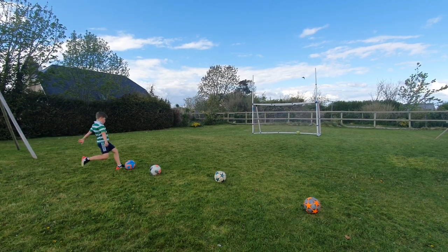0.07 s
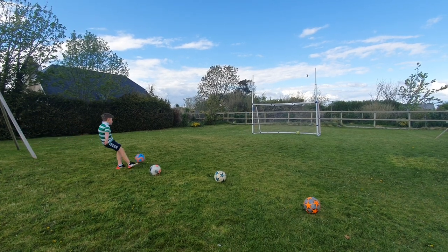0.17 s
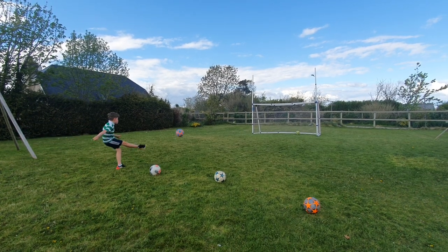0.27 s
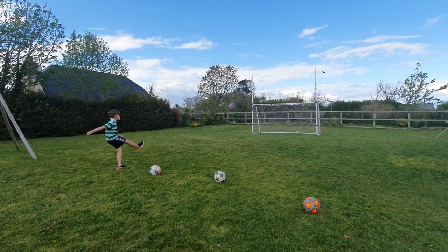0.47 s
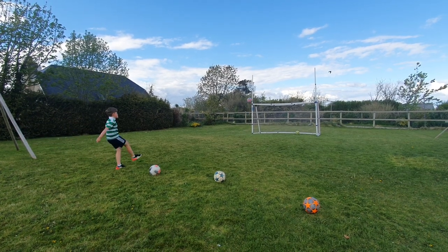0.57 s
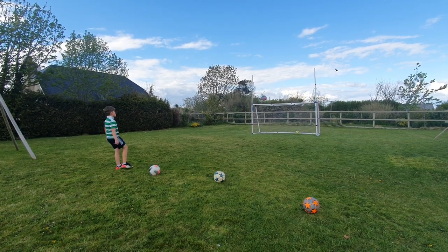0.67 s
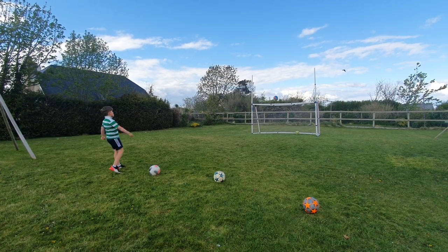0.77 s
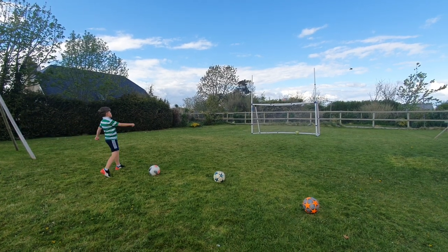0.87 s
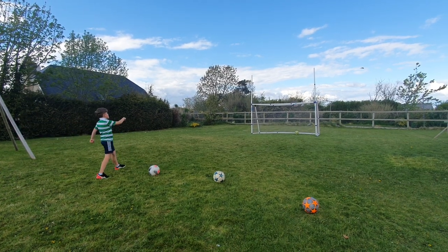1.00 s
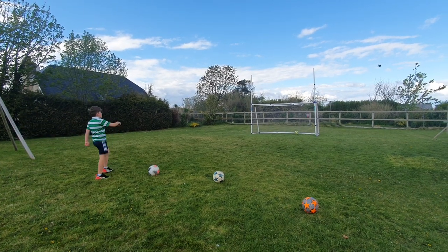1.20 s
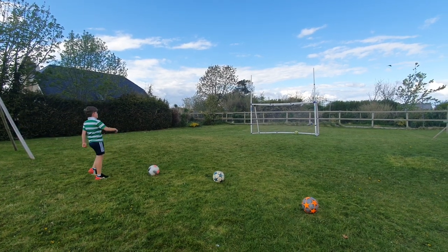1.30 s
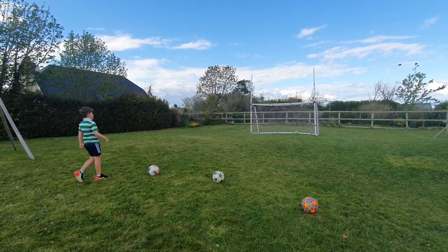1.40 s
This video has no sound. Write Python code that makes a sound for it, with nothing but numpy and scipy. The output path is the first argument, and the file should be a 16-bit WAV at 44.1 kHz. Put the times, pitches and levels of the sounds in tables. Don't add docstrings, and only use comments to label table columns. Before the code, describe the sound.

In an open garden, a ball is kicked with a punchy low thud and leathery crack, echoes fade quickly, then the ball hits a net that snaps and rustles, with a dull footfall near the end.

```python
import sys
import numpy as np
from scipy import signal
from scipy.fft import rfft, irfft, next_fast_len
from scipy.io import wavfile
from scipy.ndimage import uniform_filter1d

SR = 44100
rng = np.random.default_rng(int(sys.argv[2]) if len(sys.argv) > 2 else 0)


def field_ratio(decibels):
    return 10 ** (np.asarray(decibels, dtype=float) / 20)


def dump_mix(stems):
    frames = np.atleast_2d(stems).T
    limited = np.clip(frames, -1, 1)
    pcm = np.round(limited * 32767).astype(np.int16)
    wavfile.write(sys.argv[1], SR, pcm)


N = 63945
KICK_S = .2099
KICK_PORT_S, NET_PORT_S = .00021, -.0002

# (frequency [Hz], density [dB per Hz])
HUM_COLOUR = [(20, -13), (55, -0.5), (98, -1), (130, -9.5), (550, -22), (800, -16.5), (2100, -30),
              (2450, -43.5), (4500, -56), (15800, -79.5)]
# (frequency [Hz], correlation [-1 to 1])
PORT_LIKENESS = [(60, 0.92), (180, 1), (550, 0.37), (1650, -0.37), (4970, 0.014), (15000, 0.02)]
# (time [s], level [dB])
TRAFFIC_SWELL = [(0., 2), (0.201, 4), (0.499, 0), (.9, -1), (1.1, -1), (1.45, -1.5)]
# (start [s], length [s], pitch [Hz], level [dB])
BIRDS = [
    (0., .06, 4000, -89),
    (.975, .21, 2110, -69),
    (1.02, .06, 6300, -88),
    (.74, .07, 1800, -78),
]
# (frequency [Hz], density [dB per Hz])
CLOTH_COLOUR = [(1500, -43), (4500, 4), (7000, -4), (9000, 7), (12500, 6.5), (14000, -9), (16000, -15.5)]
NET_COLOUR = [(400, -13), (700, -1), (1400, 2), (2300, -0.5), (5000, -13), (6300, -18.5), (7500, -31),
              (15800, -44)]
SETTLING_COLOUR = [(880, -64), (1500, -1), (2040, -5.5), (2290, -8.5), (3780, -18), (4380, -12.5),
                   (15800, -34)]
GRASS_COLOUR = [(180, -33.5), (300, -6.5), (759, 3.5), (2230, -6), (5190, -11.5), (8540, -19.5),
                (9910, -10), (15800, -24)]
# (start [s], rise [s], hold [s], T60 [s], level [dB])
CLOTH_SWISHES = [
    (.06, .04, 0.025, 0.25, -70),
    (.775, 0.019, 0.015, 0.25, -78),
    (.83, 0.043, 0.044, 0.37, -77.5),
    (1.11, 0.081, 0.096, 0.14, -73.5),
]
NET_RATTLES = [
    (1.1612, 0.00056, 0.002, 0.22, -47.5),
    (1.175, 0.014, 0.03, 0.37, -47.5),
    (1.4, 0.05, .03, .3, -55.5),
]
NET_SETTLING = [
    (1.18, .012, 0.038, .4, -57),
    (1.26, .03, .03, .3, -60),
    (1.33, 0.0064, 0.0075, 0.3, -61.5),
    (1.37, .02, 0.017, 0.57, -62.5),
]
GRASS_SWEEP = [
    (.182, 0.026, 0.0088, 0.039, -34),
    (.21, .004, .015, .24, -46.5),
]
# (time [s], level [dB], centre [Hz])
CORD_SNAPS = [(1.162, -48, 4673), (1.162, -31, 1330), (1.19, -53, 10060), (1.193, -62, 4630),
              (1.211, -33, 1330), (1.222, -48, 1610), (1.241, -45, 4740), (1.446, -70, 8300)]
# (frequency [Hz], bandwidth [Hz], level [dB])
BALL_MODES = [(942, 138, 4), (1720, 340, -4), (2555, 500, -13), (3117, 340, -9.5), (3940, 190, -18.5),
              (4500, 300, -14.5), (5100, 220, -23.5), (7250, 490, -35), (8860, 700, -22),
              (10340, 1200, -29), (13500, 2000, -31)]
# (frequency [Hz], gain [dB])
LAWN_GAIN = [(100, 0), (200, 1.5), (350, 0.5), (420, -12), (500, -13.5), (700, -1.5), (2000, -9)]
# (delay [s], level [dB], sign)
FAR_ECHOES = [(.0481, -13, -1), (.0646, -2.5, -1), (.0785, -3.9, 1), (.1064, -8, 1), (.115, -5.6, 1),
              (.1382, -11.9, 1), (.1828, -23, -1)]
# (delay [s], length [s], level [dB], centre [Hz])
TREBLE_ECHOES = [(.0425, 0.0033, -34.5, 3000), (.048, 0.0031, -40, 4240), (.053, .003, -56, 6500),
                 (.075, 0.015, -43, 3900), (.125, 0.018, -54.5, 3460)]
# (frequency [Hz], T60 [s])
GARDEN_T60 = [(60, 0.35), (200, .25), (700, 0.83), (2500, 0.48), (5000, .33), (10000, 0.14), (15000, .12)]
# (frequency [Hz], left minus right [dB])
KICK_LEAN = [(60, -1), (300, 0), (1400, -9.5), (2600, 13), (5000, -2.5), (9500, -0.5), (15000, 6)]


def evened(x):
    return x / np.sqrt(np.mean(x ** 2) + 1e-20)


def read(points, hz):
    f, value = np.transpose(points)
    return np.interp(np.log(hz + 1), np.log(f + 1), value)


def late(x, s):
    size = next_fast_len(2 * N)
    hz = np.fft.rfftfreq(size, 1 / SR)
    return irfft(rfft(x, size) * np.exp(-2j * np.pi * hz * s), size)[:N]


def ports(x, s):
    return np.array([x, late(x, s)])


def ring(x, hz, width):
    r = np.exp(-np.pi * width / SR)
    return signal.lfilter([1 - r, 0, r - 1], [1, -2 * r * np.cos(2 * np.pi * hz / SR), r * r], x)


def band(x, hz, width):
    return ring(ring(x, hz, width), hz, width)


def cut(x, hz, kind):
    return signal.sosfilt(signal.butter(2, hz, kind, fs=SR, output="sos"), x)


def shape(start, rise, hold, t60, db):
    t = np.arange(N) / SR - start
    fall_db = 60 * np.clip(t - rise - hold, 0, 3) / t60
    return np.clip(t / rise, 0, 1) ** 0.83 * field_ratio(db - fall_db)


def burst(start, rise, hold, t60, db):
    return rng.standard_normal(N) * shape(start, rise, hold, t60, db)


def rustle(strokes, colour, grain_db, loose, port_s):
    hz = np.fft.rfftfreq(N, 1 / SR)
    grains = rng.standard_normal((3, N))
    unevenness = evened(uniform_filter1d(rng.standard_normal(N), size=60))
    z = rfft(grains * field_ratio(grain_db * unevenness)) * field_ratio(read(colour, hz))
    shared = np.array([z[0], z[0] * np.exp(-2j * np.pi * hz * port_s)])
    own = np.clip(loose * np.sqrt(hz / 3000), 0, .95)
    noise = evened(irfft(np.sqrt(1 - own ** 2) * shared + own * z[1:], N))
    power = sum(shape(*stroke) ** 2 for stroke in strokes)
    return np.sqrt(power) * noise


def traffic_hum():
    frames, hz = N // 256 + 5, np.fft.rfftfreq(1024, 1 / SR)
    a, b, c, d, patches = rng.standard_normal((frames, 513, 5)).T
    patches = evened(uniform_filter1d(uniform_filter1d(patches, 8, 0), 10, 1))
    same = np.clip(read(PORT_LIKENESS, hz), -1, 1)[:, None]
    left = a + 1j * b
    right = same * left + np.sqrt(1 - same ** 2) * (c + 1j * d)
    z = np.array([left, right]) * field_ratio(read(HUM_COLOUR, hz)[:, None] + 1.2 * patches)
    steady = evened(signal.istft(z, nperseg=1024, noverlap=768)[1][:, :N])
    swell_db = np.interp(np.arange(N) / SR, *np.transpose(TRAFFIC_SWELL))
    return field_ratio(swell_db - 48.5) * steady


def microphone_hiss():
    return field_ratio(-86) * rng.standard_normal((2, N))


def birds():
    t, out = np.arange(N) / SR, np.zeros(N)
    for start, length, hz, db in BIRDS:
        u = np.clip((t - start) / length, 0, 1)
        flutter_db = 2.2 * evened(uniform_filter1d(rng.standard_normal(N), size=500))
        swell = np.sqrt(abs(np.sin(np.pi * u)))
        turns = np.cumsum(hz * (1 - 0.0244 * u)) / SR
        out += field_ratio(db + flutter_db) * swell * np.sin(2 * np.pi * turns)
    return ports(out, .00005)


def cloth_swishes():
    return rustle(CLOTH_SWISHES, CLOTH_COLOUR, 1.5, .6, KICK_PORT_S)


def footfall():
    t = np.maximum(np.arange(N) / SR - 1.437, 0)
    level = field_ratio(-38.5 + 6 * np.array([[1], [-1]]))
    return level * np.minimum(t / 0.0046, 1) * np.sin(2 * np.pi * 73.4 * t)


def net_rustle():
    rattles = rustle(NET_RATTLES, NET_COLOUR, 2.8, 0.9, NET_PORT_S)
    return rattles + rustle(NET_SETTLING, SETTLING_COLOUR, 2.2, 1.0, NET_PORT_S)


def cord_snaps():
    ticks = sum(band(burst(s, .0003, 0.00033, 0.018, db + 1.5), hz, 0.65 * hz) for s, db, hz in CORD_SNAPS)
    return ports(ticks, NET_PORT_S)


def grass_sweep():
    return rustle(GRASS_SWEEP, GRASS_COLOUR, 2.8, .5, KICK_PORT_S)


def garden_tail(x):
    taps = np.zeros((2, SR // 2))
    slots = np.arange(700, SR // 2 - 20, 20)
    at = slots + rng.integers(0, 20, (2, len(slots)))
    np.put_along_axis(taps, at, rng.choice([-1., 1.], at.shape), 1)
    hz, t, z = signal.stft(taps, SR, nperseg=512)
    same = np.clip(read(PORT_LIKENESS, hz), -1, 1)[:, None]
    z = np.array([z[0], same * z[0] + np.sqrt(1 - same ** 2) * z[1]])
    decay = field_ratio(-60 * t / read(GARDEN_T60, hz)[:, None])
    tail = signal.istft(z * decay, SR, nperseg=512)[1]
    return signal.fftconvolve(x[None], tail / np.linalg.norm(tail[0]), axes=1)[:, :N]


def treble_echoes():
    out = np.zeros((2, N))
    for k, (s, length, db, hz) in enumerate(TREBLE_ECHOES):
        clap = band(burst(KICK_S + s, .001, length, .03, db + 6.5), hz, 0.26 * hz)
        out += ports(clap, KICK_PORT_S / 2 * (-1) ** k)
    return out


def ball_push():
    start_hz, rest_hz, squash_s = 294, 70.7, .0024
    t = np.maximum(np.arange(N) / SR - KICK_S, 0)
    turns = rest_hz * t + start_hz * squash_s * (1 - np.exp(-t / squash_s))
    wobble = field_ratio(-60 * t / .16)
    blow = 7.6 * np.exp(-t / .0023)
    size = (wobble + blow) * (1 - np.exp(-t / .05))
    swing = -field_ratio(10.4) * size * np.sin(2 * np.pi * turns)
    return irfft(rfft(swing) * field_ratio(read(LAWN_GAIN, np.fft.rfftfreq(N, 1 / SR))), N)


def ball_crack():
    slap = burst(KICK_S, 0.00032, .0034, .008, 0)
    return field_ratio(-31.5) * sum(field_ratio(db) * ring(slap, hz, w) / np.sqrt(w / SR) for hz, w, db in BALL_MODES)


def kick():
    low, high = ball_push(), ball_crack()
    near_s = .0142
    near_low = -field_ratio(-6.6) * late(low, near_s)
    near_high = late(field_ratio(-3.5) * cut(cut(high, 2000, "low"), 2000, "low"), near_s)
    deep = cut(low, 33.5, "low")
    far = sum(sign * field_ratio(db) * late(deep, s) for s, db, sign in FAR_ECHOES)
    both = ports(low + near_low + far, .00015) + ports(high + near_high, KICK_PORT_S)
    lean = field_ratio(read(KICK_LEAN, np.fft.rfftfreq(N, 1 / SR)) / 2)
    out = irfft(rfft(both) * [lean, 1 / lean], N) + treble_echoes()
    puff = field_ratio(-15) * (np.arange(N) == round(KICK_S * SR))
    tail_low = field_ratio(-14.5) * cut(cut(low, 150, "high"), 150, "high")
    tail_high = cut(cut(puff, 906, "high"), 4800, "low")
    return out + garden_tail(tail_low + tail_high)


def scene():
    background = traffic_hum() + microphone_hiss()
    strike = kick() + grass_sweep()
    cloth = cloth_swishes()
    net = net_rustle() + cord_snaps()
    return background + strike + cloth + net + birds() + footfall()


def low_pass(x):
    return signal.sosfilt(signal.butter(12, 15910, fs=SR, output="sos"), x)


def record(dry):
    return low_pass(dry)


dry = scene()
out = record(dry)
dump_mix(out)
```